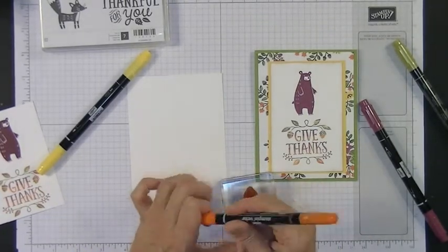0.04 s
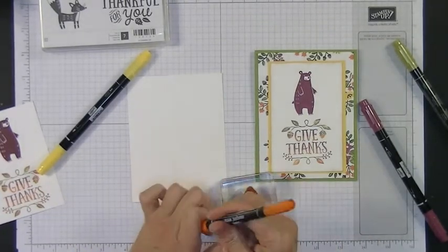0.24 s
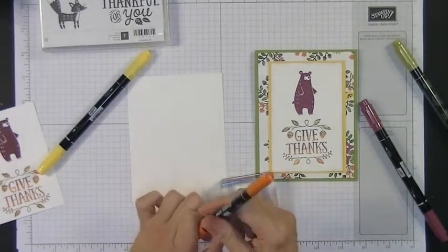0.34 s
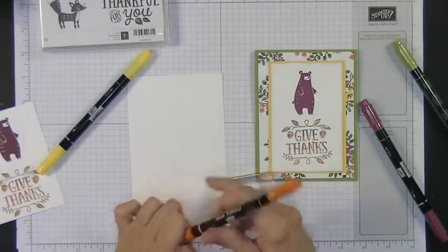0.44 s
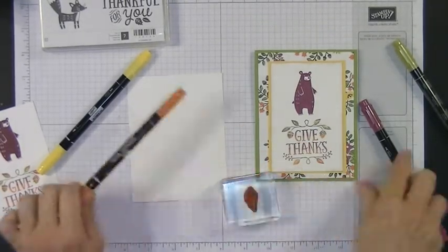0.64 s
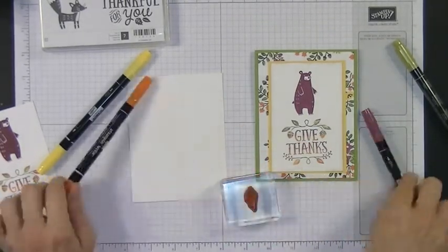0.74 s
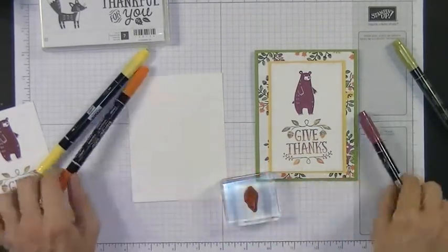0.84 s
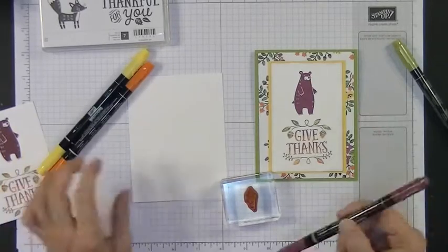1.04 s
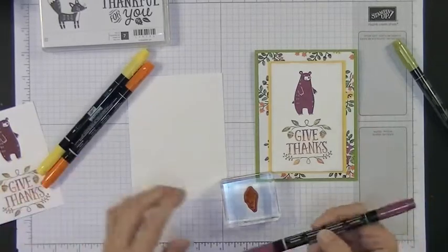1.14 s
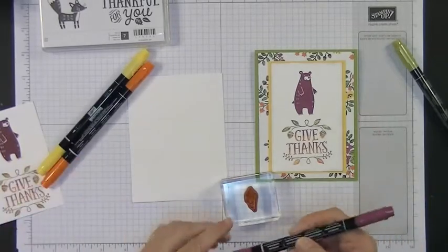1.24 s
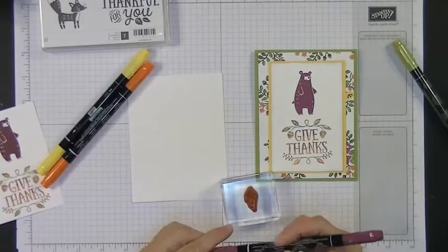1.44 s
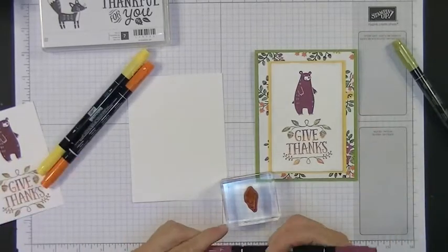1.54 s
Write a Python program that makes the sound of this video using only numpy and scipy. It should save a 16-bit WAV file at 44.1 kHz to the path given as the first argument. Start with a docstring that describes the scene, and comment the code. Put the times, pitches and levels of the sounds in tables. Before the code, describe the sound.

Plastic felt markers on a craft table: faint cap rubbing and ticks, one sharp cap snap, a pause, then two hard knocks with hollow thuds and small ticks, close microphone in a small quiet room.

```python
"""Felt markers on a craft table

Plastic felt markers in a small quiet room: a cap is worked on with rubs and ticks and snaps shut (ringing modes),
barrels knock on the hollow table top (crack plus ringing thud), pens tick together (band-passed clicks).
A wall clock ticks once a second (ringing case); a camera's focus motor steps faintly (short sine bursts)."""
import sys
import numpy as np
from scipy import signal
from scipy.io import wavfile

SR = 44100
rng = np.random.default_rng(int(sys.argv[2]) if len(sys.argv) > 2 else 0)


def generate_wav(sig):
    """Save sig (samples, or channels by samples) to the path in sys.argv[1] as 16-bit PCM at SR."""
    pcm = np.round(np.clip(np.atleast_2d(sig).T, -1, 1) * 32767).astype(np.int16)
    wavfile.write(sys.argv[1], SR, pcm)


def gain_from_db(level_db):
    """Convert decibel levels to linear amplitude factors (20 dB per decade)."""
    decades = np.asarray(level_db, float) / 20
    return 10 ** decades


N = 70560
BODY_LOW_HZ, MIC_TOP_HZ = 490, 15700

# cap closing: start_s, click_db, left_minus_right_db
SNAP = (.2126, -0.6, 1.54)
SNAP_CRACK_LOW_HZ, SNAP_CRACK_HIGH_HZ, SNAP_CRACK_DB, SNAP_CRACK_ROOM_DB = 1800, 6900, 2.4, 6
SNAP_BODY_ROOM_DB = -11


def snap():
    """The cap clicks over its ridge: returns near sound and room send."""
    start_s, click_db, _ = SNAP
    hit = click(start_s, click_db)
    body = cut(ring_modes(hit, CAP_MODES), BODY_LOW_HZ, MIC_TOP_HZ)
    crack = cut(hit, SNAP_CRACK_LOW_HZ, SNAP_CRACK_HIGH_HZ)
    near = body + gain_from_db(SNAP_CRACK_DB) * crack
    far = gain_from_db(SNAP_BODY_ROOM_DB) * body + gain_from_db(SNAP_CRACK_ROOM_DB) * crack
    return hollow(near), hollow(far)


# barrels landing on the table: start_s, crack_click_db, thud_click_db, spot (0 left, 1 right)
KNOCKS = [(0.721, -62, -53, 0.22), (.7633, -11.5, -25.5, 0.093), (0.916, -58.5, -55, 1),
          (0.9864, -13, -25, 0.97)]
# table top modes: pitch_hz, left_spot_db, right_spot_db, t60_s
TABLE_MODES = [(58.6, -15, -19, 0.25), (121, -15, -6, 0.15), (212, -16.5, -3.5, 0.11),
               (231.6, -11, -32, 0.18), (271.9, 2.5, 0.5, 0.23), (324.7, -11, 3, 0.15), (417, -7, -4, 0.11),
               (524, -9, -1.5, 0.057), (739, -12.5, -45, 0.12), (1100, -22, -22, 0.072)]
# barrel modes: pitch_hz, left_spot_db, right_spot_db, t60_s
BARREL_MODES = [(1105, -20, -17, 0.012), (1880, -14, -57, 0.014), (2236, -10.5, -13, 0.0078),
                (2560, -24.5, -4, 0.0042), (4350, -23, -0.5, 0.00067), (5700, -24, -30, 0.0028),
                (6850, -25.5, -14.5, 0.0013)]
KNOCK_CRACK_LOW_HZ, KNOCK_CRACK_HIGH_HZ, KNOCK_CRACK_DB, KNOCK_CRACK_ROOM_DB = 270, 5900, 3.4, 3.5
BARREL_TOP_HZ, BARREL_ROOM_DB = 10400, -4
THUD_LAG_S, THUD_LOW_HZ, THUD_SOFT_HZ, PUSH_DB = 0.00077, 116, 900, 9


def knocks():
    """A hard barrel crack, then a softer push that rings the table top: near, room send, thud."""
    near = far = thud = 0
    for start_s, crack_db, thud_db, spot in KNOCKS:
        hit = click(start_s, crack_db)
        body = ring_modes(hit, modes_at_spot(BARREL_MODES, spot))
        body = cut(body, BODY_LOW_HZ, BARREL_TOP_HZ)
        crack = cut(hit, KNOCK_CRACK_LOW_HZ, KNOCK_CRACK_HIGH_HZ)
        crack = cut(crack, KNOCK_CRACK_LOW_HZ, KNOCK_CRACK_HIGH_HZ)
        near = near + body + gain_from_db(KNOCK_CRACK_DB) * crack
        far = far + gain_from_db(BARREL_ROOM_DB) * body + gain_from_db(KNOCK_CRACK_ROOM_DB) * crack
        push = cut(click(start_s + THUD_LAG_S, thud_db), THUD_LOW_HZ, THUD_SOFT_HZ)
        thud = thud - gain_from_db(PUSH_DB) * push
        for k, (hz, db, t60_s) in enumerate(modes_at_spot(TABLE_MODES, spot)):
            thud = thud + (-1) ** k * gain_from_db(db) * ring(push, hz, t60_s)  # modes alternate in sign
    return near, far, thud


def modes_at_spot(modes, spot):
    """Mode levels in dB, interpolated between the left and right landing spots."""
    return [(hz, left_db + spot * (right_db - left_db), t60_s) for hz, left_db, right_db, t60_s in modes]


# small plastic contacts: start_s, peak_db (ahead of the dips and pan), low_hz, high_hz
TICKS = [(0.0347, -34, 1000, 6000), (0.0386, -30, 1000, 7000), (0.0414, -31, 1000, 7500),
         (0.0569, -27.5, 1090, 9000), (0.0625, -32, 2000, 9000), (.0800, -32, 2820, 11500),
         (.1008, -36, 5000, 8000), (.1014, -34, 5000, 15000), (.1020, -32, 4500, 13000),
         (.2123, -20, 3900, 13000), (0.7191, -41, 5200, 7500), (0.8626, -39, 3470, 8800),
         (0.8758, -43, 5400, 11000), (.889, -29, 500, 7000), (1.0237, -35, 5000, 7500),
         (1.069, -38, 3020, 6000)]
# cap and barrel modes, also rung by snap(): pitch_hz, level_db, t60_s
CAP_MODES = [(676, -31.5, 0.0065), (1200, -57, 0.0028), (1600, -24.5, 0.011), (2560, -20, 0.0056),
             (3070, -18, 0.0031), (3820, -12.5, 0.0037), (5190, -17.5, 0.0043), (6660, -22, 0.0024),
             (8250, -14.5, 0.0025), (9860, -18, 0.0046), (11000, -14.5, 0.0017)]
TICK_BODY_DB, TICK_PAN_DB = -3.5, 1


def ticks():
    """Each tick is a click that rings the cap, heard through its own band."""
    hit = click(0, 0)[:SR // 20]
    hit = hit + gain_from_db(TICK_BODY_DB) * ring_modes(hit, CAP_MODES)
    out = np.zeros(N + len(hit))
    for start_s, peak_db, low_hz, high_hz in TICKS:
        tick = cut(cut(hit, low_hz, high_hz), low_hz, high_hz)
        start = int(start_s * SR)
        out[start:start + len(hit)] += tick / np.abs(tick).max() * gain_from_db(peak_db)
    return pan(hollow(out[:N]), TICK_PAN_DB)


# weak radiation of the hollow cap: pitch_hz, width_hz
CAP_DIPS = [(2150, 170), (5650, 280), (12600, 850)]


def hollow(x):
    """Dips between the cap's resonances."""
    for hz, width_hz in CAP_DIPS:
        x = x - .72 * resonance(x, hz, width_hz)
    return x


# cap grinding on the barrel or a barrel sliding: start_s, length_s, level_db, pitch_hz, width_hz
RUBS = [(0.034, 0.1, -51.5, 3160, 500), (0.049, 0.058, -50, 1710, 900), (0.093, 0.04, -57, 5450, 3900),
        (0.874, 0.057, -54, 900, 1200), (1.2531, 0.008, -48.5, 3620, 2500), (1.255, 0.0098, -45, 2150, 900)]
SLIPS_PER_S, SLIP_ROUGH_DB = 1800, 3.5


def rubs():
    """Friction as dense random slips of uneven strength, resonated under a short stroke."""
    t, out = np.arange(N) / SR, 0
    for start_s, length_s, level_db, hz, width_hz in RUBS:
        slips = rng.random(N) < SLIPS_PER_S / SR
        strength = gain_from_db(SLIP_ROUGH_DB * np.minimum(rng.exponential(1, N), 3))
        slips = slips * strength * rng.choice([-1, 1], N)
        grit = resonance(resonance(slips, hz, width_hz), hz, width_hz)
        stroke = np.sin(np.pi * np.clip((t - start_s) / length_s, 0, 1) ** .5) ** .5
        out = out + gain_from_db(level_db) * grit / grit.std() * stroke
    return out


# clock case modes: pitch_hz, level_db, t60_s
CLOCK_MODES = [(490, -6, 0.023), (545, 0, 0.04), (710, -1.5, 0.02), (1740, -8, 0.041), (1980, -7, 0.02),
               (6540, -21, 0.018)]
CLOCK_START_S, CLOCK_PERIOD_S, DROP_DB = .397, 1.0, -46
PAWL_S, PAWL_DB, REBOUND_S, REBOUND_DB = 0.016, -50, 0.024, -5


def clock():
    """The pawl scrapes, drops and the hand rebounds once, ringing the case."""
    t, hits = np.arange(N) / SR, 0
    for drop_s in CLOCK_START_S + CLOCK_PERIOD_S * np.arange(2):
        scraping = (t > drop_s - PAWL_S) * (t < drop_s)
        scrape = scraping * rng.standard_normal(N) * (rng.random(N) < .03)
        drops = click([drop_s, drop_s + REBOUND_S], [DROP_DB, DROP_DB + REBOUND_DB])
        hits = hits + drops + gain_from_db(PAWL_DB) * np.diff(scrape, prepend=0)
    return ring_modes(hits, CLOCK_MODES)


# focus motor, one row a step: whirr_db, whine_db
MOTOR_STEPS = [(-45.5, -78), (-50, -71), (-52, -72), (-52.5, -75), (-58, -59), (-54, -63), (-76, -70),
               (-71, -70), (-69, -62), (-61, -58), (-56.5, -56), (-56, -60), (-58, -65), (-54, -56.5),
               (-55.5, -78), (-54.5, -59.5), (-57, -57.5), (-56.5, -78), (-51, -58.5), (-75, -79),
               (-52, -58.5), (-69, -82)]
STEP_START_S, STEP_PERIOD_S, STEP_LENGTH_S = .0145, .03337, .011
WHIRR_HZ, WHINE_HZ, WHINE_LAG_S = 890, 2890, .004


def focus_motor():
    """Each step is a short low sine burst, with a whine burst just after."""
    t, out = np.arange(N) / SR, 0
    for step, (whirr_db, whine_db) in enumerate(MOTOR_STEPS):
        step_s = STEP_START_S + STEP_PERIOD_S * step
        for hz, db, lag_s in (WHIRR_HZ, whirr_db, 0), (WHINE_HZ, whine_db, WHINE_LAG_S):
            phase = np.clip((t - step_s - lag_s) / STEP_LENGTH_S + .5, 0, 1)
            shape = np.sin(np.pi * phase) ** 2
            out = out + gain_from_db(db) * shape * np.sin(2 * np.pi * (hz * t + rng.random()))
    return out


# room decay: pitch_hz, t60_s
ROOM_T60 = [(150, 0.22), (500, 0.29), (1500, 0.27), (4000, 0.28), (8000, 0.235), (15000, 0.17)]
# room tail colour: pitch_hz, level_db (before scaling by decay time)
ROOM_COLOUR = [(150, 4), (500, 8), (1500, 3), (4000, -0.5), (8000, -5.5), (15000, -1)]
# room tail width: pitch_hz, side_minus_mid_db
ROOM_SIDE = [(60, -8), (240, -27), (950, -20), (3770, -38), (15000, -69)]
ROOM_GAP_S, ROOM_RISE_S, EARLY_DB, EARLY_S = 0.00017, 0.0062, 4, 0.019


def room(x):
    """Reflections as a noise tail, lifted early by nearby surfaces, dying band by band."""
    t = np.arange(SR // 2) / SR
    swell = 1 - np.exp(-np.maximum(t - ROOM_GAP_S, 0) / ROOM_RISE_S)
    swell = swell * gain_from_db(EARLY_DB * np.exp(-(t / EARLY_S) ** 2))

    def decay(hz):
        """Band envelope; long-lived bands start lower."""
        t60_s = at_hz(ROOM_T60, hz)
        return gain_from_db(at_hz(ROOM_COLOUR, hz) - 60 * t / t60_s) / np.sqrt(t60_s)

    tail = swell * bands(SR // 2, decay, ROOM_SIDE)
    return signal.fftconvolve(x[None], tail / np.sqrt(SR / 14), axes=1)[:, :N]


# room tone spectrum: pitch_hz, relative_density_db
AIR = [(13, -30), (22, -2), (351, -2.5), (594, -6), (876, -8), (1360, -10), (2880, -14), (3700, -14.5),
       (14800, -26), (16500, -64)]
# room tone width: pitch_hz, side_minus_mid_db
AIR_SIDE = [(60, -5.5), (240, -3.5), (950, -1.5), (3770, -12), (15000, -84)]
AIR_RMS_DB = -57


def room_tone():
    """Steady stereo noise shaped band by band."""
    air = bands(N, lambda hz: gain_from_db(at_hz(AIR, hz)), AIR_SIDE)
    return gain_from_db(AIR_RMS_DB) * air / air.std()


BAND_EDGES_HZ = 22 * 2 ** np.arange(0, 9.7, .4)


def bands(count, gain, side):
    """Stereo noise built band by band; gain(hz) may be an envelope."""
    warmup = SR // 4
    white, out = rng.standard_normal((2, 2, count + warmup)), 0
    for k, (low_hz, high_hz) in enumerate(zip(BAND_EDGES_HZ, BAND_EDGES_HZ[1:])):
        sos = signal.butter(2, [low_hz, high_hz], "band", fs=SR, output="sos")
        mid, other = signal.sosfilt(sos, white[k % 2])[:, warmup:]  # neighbours use separate noise
        hz = np.sqrt(low_hz * high_hz)
        out = out + gain(hz) * (mid + gain_from_db(at_hz(side, hz)) * other * np.array([[1], [-1]]))
    return out


def at_hz(points, hz):
    """Reads a table on a log-frequency axis."""
    table_hz, value = np.array(points).T
    return np.interp(np.log(hz), np.log(table_hz), value)


def click(s, db):
    """Impulses at given times, over a floor far below hearing."""
    out = np.full(N, 1e-18)
    np.add.at(out, (np.atleast_1d(np.array(s)) * SR).astype(int), gain_from_db(np.atleast_1d(db)))
    return out


def ring(x, hz, t60_s):
    """A damped two-pole mode: a unit click starts a sine of height 1."""
    r, w = gain_from_db(-60 / (t60_s * SR)), 2 * np.pi * hz / SR
    return signal.lfilter([0, np.sin(w)], [1, -2 * r * np.cos(w), r * r], x)


def ring_modes(x, modes):
    """Sum of the modes of a struck body."""
    return sum(gain_from_db(db) * ring(x, hz, t60_s) for hz, db, t60_s in modes)


def resonance(x, hz, width_hz):
    """Two-pole band with peak gain 1."""
    r = np.exp(-np.pi * width_hz / SR)
    poles = [1, -2 * r * np.cos(2 * np.pi * hz / SR), r * r]
    return signal.lfilter(np.array([1, 0, -1]) * (1 - r * r) / 2, poles, x)


def cut(x, low_hz, high_hz):
    """High-pass and low-pass, two poles each."""
    high_pass = signal.butter(2, low_hz, "high", fs=SR, output="sos")
    low_pass = signal.butter(2, high_hz, fs=SR, output="sos")
    return signal.sosfilt(np.vstack([high_pass, low_pass]), x)


def pan(x, db):
    """Places a sound by a left-minus-right level difference."""
    return x * gain_from_db(np.array([[db / 2], [-db / 2]]))


KNOCK_PAN_DB, TABLE_ECHO_S, TABLE_ECHO_DB = 1.5, .0007, -9
TICK_ROOM_DB, RUB_ROOM_DB, THUD_ROOM_DB, CLOCK_ROOM_DB = 0.5, -18.5, -11, -8


def scene():
    """Pens with their echo off the table, thuds, clock, motor, room and room tone."""
    cap, cap_far = snap()
    crack, crack_far, thud = knocks()
    small, rub, tock = ticks(), rubs(), clock()
    near = pan(cap, SNAP[2]) + small + rub + pan(crack, KNOCK_PAN_DB)
    near = near + gain_from_db(TABLE_ECHO_DB) * np.roll(near, int(TABLE_ECHO_S * SR), axis=1)
    send = cap_far + crack_far + gain_from_db(TICK_ROOM_DB) * small.mean(axis=0) + gain_from_db(RUB_ROOM_DB) * rub
    send = send + gain_from_db(THUD_ROOM_DB) * thud + gain_from_db(CLOCK_ROOM_DB) * tock
    air = room_tone()
    return near + pan(thud, KNOCK_PAN_DB) + tock + room(send) + focus_motor() + air


def band_limit(x):
    """A steep low-pass at the top of the band."""
    return signal.sosfilt(signal.butter(12, 17070, fs=SR, output="sos"), x)


def record(dry):
    """The microphone's top falls away steeply."""
    mix = signal.sosfilt(signal.butter(10, MIC_TOP_HZ, fs=SR, output="sos"), dry)
    return band_limit(mix)


dry = scene()
out = record(dry)
generate_wav(out)
```